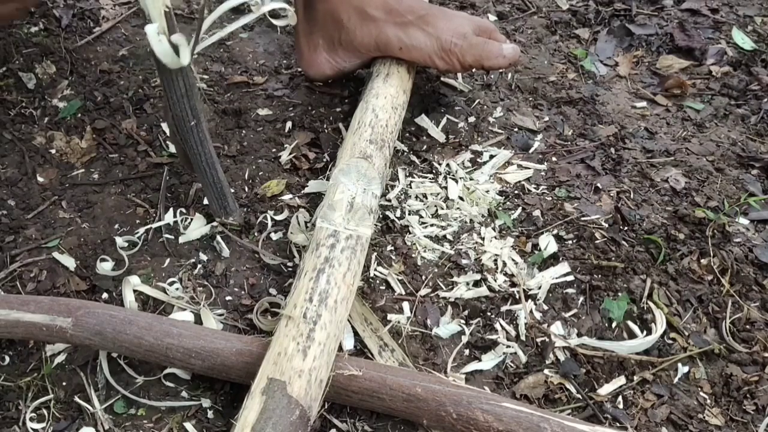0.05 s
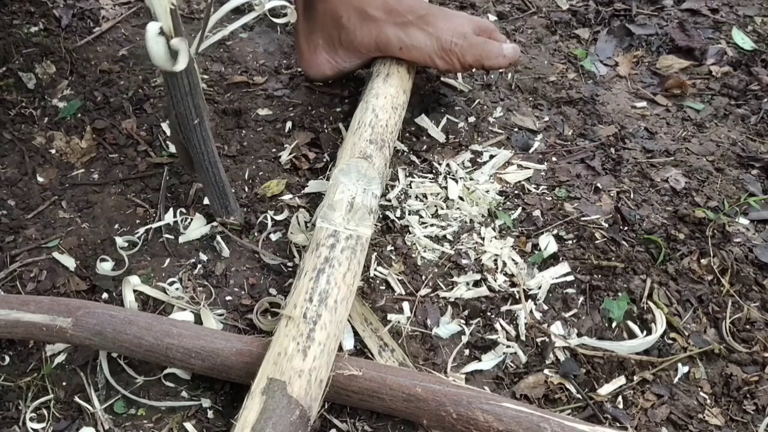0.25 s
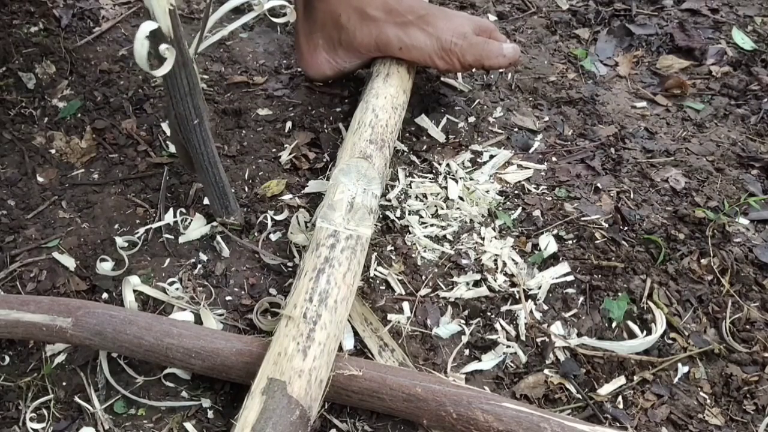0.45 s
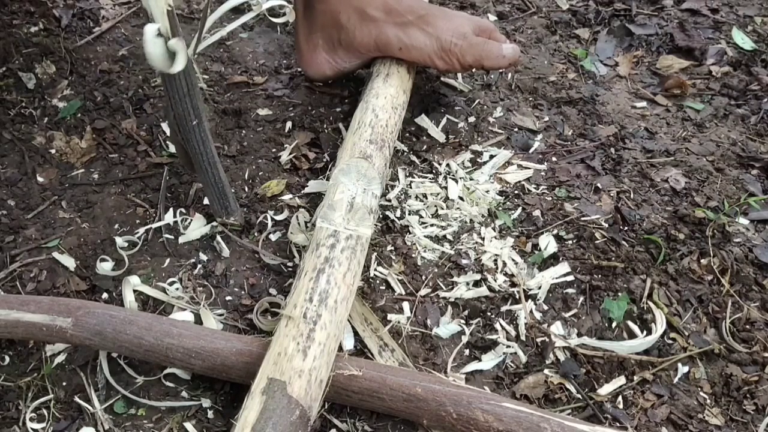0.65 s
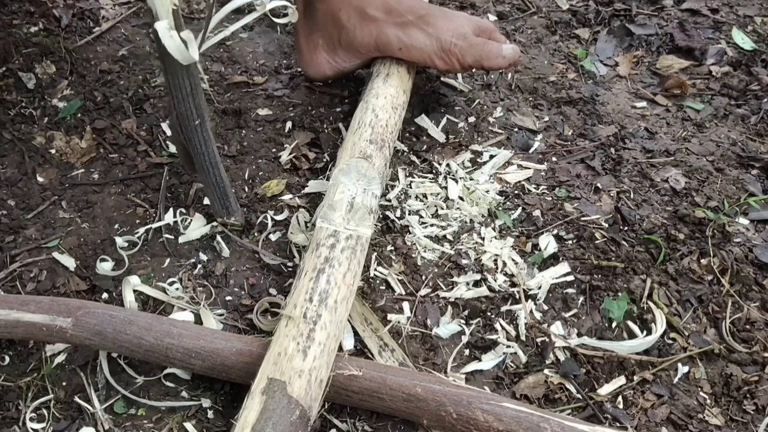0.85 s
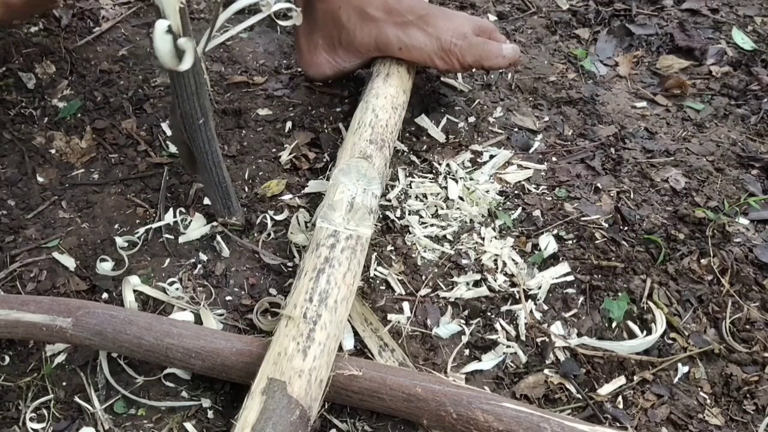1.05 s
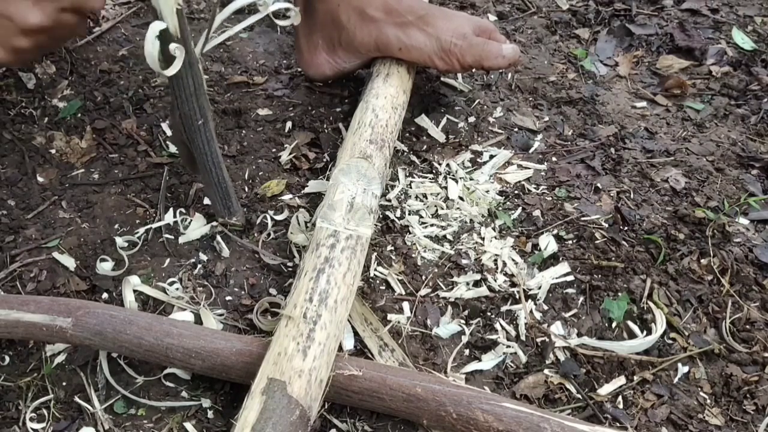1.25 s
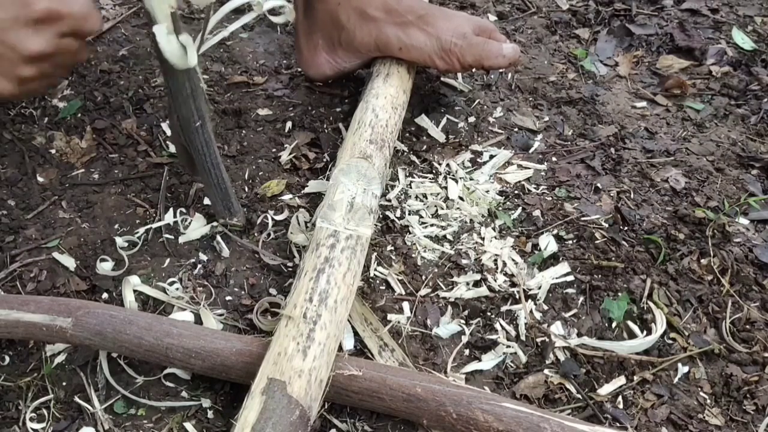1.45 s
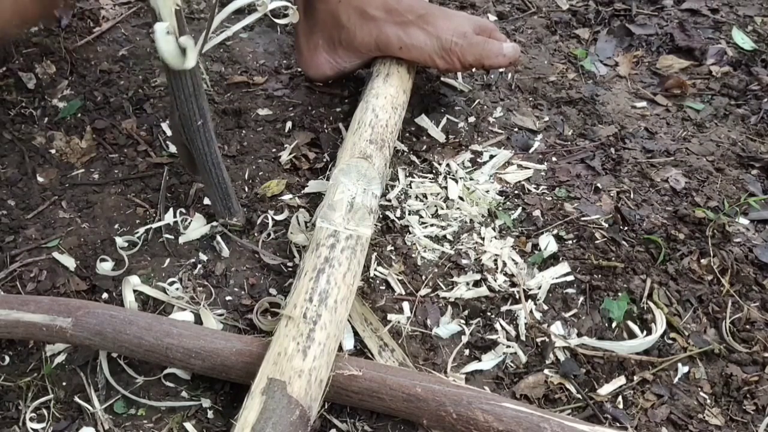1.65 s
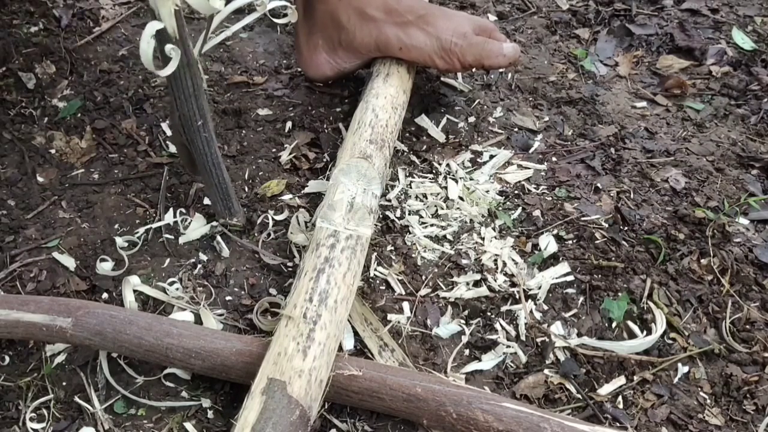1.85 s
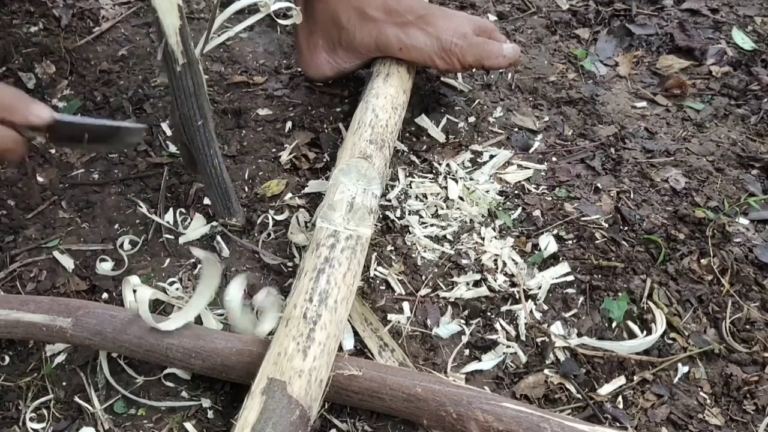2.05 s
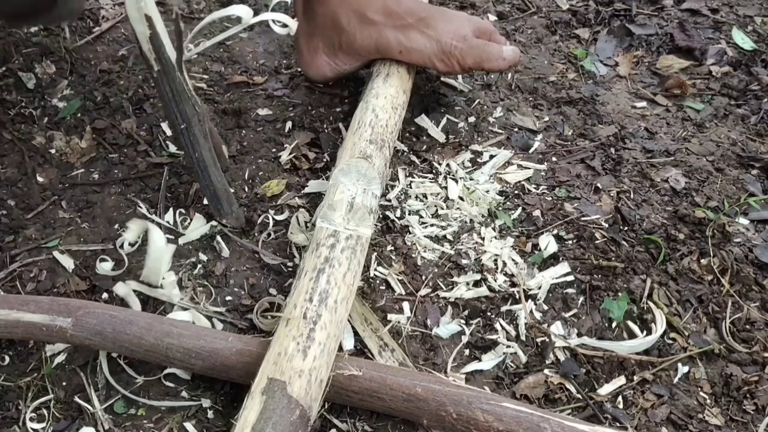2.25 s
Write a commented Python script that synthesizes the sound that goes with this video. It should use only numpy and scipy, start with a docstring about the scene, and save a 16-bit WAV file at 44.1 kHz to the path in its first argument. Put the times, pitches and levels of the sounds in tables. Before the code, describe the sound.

A knife shaves a wooden stick in quick, even, scratchy strokes, close by outdoors.

```python
"""A knife shaves curls off a wooden stick, about four strokes a second, on a forest floor close to
a stereo microphone. Drawn back, the blade sticks and slips in a run of knocks; pushed forward, it
bites, scrapes and ends in a bright crack and a soft thud. The stick rumbles faintly against the
ground. Ground and trees return short reflections; behind lie still air and a thin hiss of far insects."""
import sys
import numpy as np
from scipy import signal
from scipy.fft import rfft, irfft, next_fast_len
from scipy.io import wavfile
from scipy.ndimage import uniform_filter1d

SR = 44100
rng = np.random.default_rng(int(sys.argv[2]) if len(sys.argv) > 2 else 0)


def unload_audio(sound):
    """Save the sound as a 16-bit wav file, at the path given as the first command line argument."""
    columns = np.transpose(np.atleast_2d(sound))
    # keep every value between -1 and 1, then stretch to whole-number steps
    steps = np.round(np.clip(columns, -1, 1) * 32767)
    wavfile.write(sys.argv[1], SR, steps.astype(np.int16))


N = 105840
T = np.arange(N) / SR
GRAIN_WIDTH = 0.22  # side over mid: the blade's noise sits near the centre

# The blade is drawn back. Each row: first full slip in seconds, slip rate in Hz,
# time at full pressure in seconds, relative level in dB.
DRAGS = [(0.089, 104, 0.015, -39.5), (0.3121, 119, 0.016, -37), (0.5447, 133, 0.022, -37),
         (0.7835, 147, 0.017, -33.5), (1.0212, 160, 0.022, -35), (1.2442, 188, 0.021, -34.5),
         (1.4731, 158, 0.015, -34), (1.6990, 122.4, .025, -36), (1.9594, 154, 0.0095, -40.5)]


def from_db(db):
    """Decibels to gain."""
    return 10 ** (np.asarray(db) / 20)


def at_hz(points, hz):
    """Read a table on a log-frequency axis."""
    f, value = np.transpose(points)
    return np.interp(np.log(hz + 1), np.log(f), value)


def colour(x, spectrum, size=4096):
    """Causal filter with the spectrum's shape; white noise keeps its power."""
    gain = from_db(at_hz(spectrum, np.fft.rfftfreq(size, 1 / SR)))
    cepstrum = irfft(np.log(gain))
    cepstrum[1:size // 2] *= 2  # fold to minimum phase
    cepstrum[size // 2 + 1:] = 0
    response = irfft(np.exp(rfft(cepstrum)))
    response /= np.linalg.norm(response)
    return signal.fftconvolve(np.atleast_2d(x), response[None], axes=1)[:, :N]


def stereo_noise(width, size=N):
    """White noise, alike on both sides but for a side share."""
    mid, side = rng.standard_normal((2, size))
    return (mid + width * side * np.array([[1], [-1]])) / np.hypot(1, width)


def envelope(peak_s, rise_s, hold_s, decay_s):
    """Exponential rise to the peak, a hold, an exponential decay."""
    return np.exp(np.minimum(T - peak_s, 0) / rise_s - np.maximum(T - peak_s - hold_s, 0) / decay_s)


def clicks(s, db):
    """Single impulses at the given times."""
    x = np.zeros(N) + 1e-18
    x[np.clip((np.asarray(s) * SR).astype(int), 0, N - 1)] = from_db(db)
    return x


def resonate(x, hz, width):
    """One resonance with gain 1 at its peak."""
    r = np.exp(-np.pi * width / SR)
    poles = [1, -2 * r * np.cos(2 * np.pi * hz / SR), r * r]
    return signal.lfilter(np.array([1, 0, -1]) * (1 - r * r) / 2, poles, x)


def grains(spread_db, size=12):
    """Noise of tearing fibres: tiny clumps of uneven strength, rms 1."""
    clumps = uniform_filter1d(rng.standard_normal(N), size) * np.sqrt(size)
    x = stereo_noise(GRAIN_WIDTH) * from_db(spread_db * clumps)
    return x / x.std()


def forest_air():
    """Still air all around the microphone, with far insects hissing near 6 kHz."""
    # Each row: frequency in Hz, relative level in dB.
    spectrum = [(30, -21), (60, -1), (110, -2.5), (320, -8.5), (550, -14), (1400, -16), (4400, -21.5),
                (5100, -31), (6000, -3), (7200, -26.5), (16000, -28)]
    return from_db(-72.5) * colour(stereo_noise(width=0.78), spectrum)


def stick_rumble(full_s=0.94, work_end_s=2.186):
    """The stick shifts against the ground until the work stops."""
    # Each row: frequency in Hz, relative level in dB.
    spectrum = [(30, -58.5), (60, -34.5), (100, 2.5), (170, 0.5), (260, -6.5), (600, -17.5), (1500, -18.5),
                (2700, -13.5), (5000, -18.5), (10000, -24.5), (16000, -47)]
    level = from_db(-63.5) * envelope(full_s, rise_s=3.6, hold_s=work_end_s - full_s, decay_s=0.024)
    return level * colour(stereo_noise(width=0.335), spectrum)


def rasp():
    """The edge rubs over the grain while it is drawn back."""
    # Each row: frequency in Hz, relative level in dB.
    spectrum = [(100, -49), (350, 7), (650, 11.5), (1700, 0), (2700, -7.5), (4200, 1), (6000, -1.5),
                (10000, -14.5), (13000, -13.5), (16000, -34)]
    pressure = sum(from_db(db - 16) * envelope(s, rise_s=0.009, hold_s=hold, decay_s=0.02)
                   for s, _, hold, db in DRAGS)
    return colour(pressure * grains(spread_db=3), spectrum)


def slips(count=14):
    """Stick-slip as (seconds, dB): each drag builds, runs evenly under pressure, fades and stumbles."""
    rise_db_per_s, sag_db_per_s, release_db_per_s = 1200, 50, 380
    drop_db, spread_db, jitter_periods = 7, 0.8, 0.18
    rows = []
    for start, rate_hz, hold, db in DRAGS:
        timing, force = rng.standard_normal((2, count))
        t = (np.arange(count) - 2) / rate_hz  # two weak slips lead in
        late = np.maximum(t - hold, 0)
        loose = np.minimum(late * rate_hz, 1)
        level = db + rise_db_per_s * np.minimum(t, 0) - sag_db_per_s * np.clip(t, 0, hold)
        level -= release_db_per_s * late + drop_db * loose
        stumble = jitter_periods / rate_hz * np.cumsum(loose * timing)
        rows += zip(start + t + stumble, level + spread_db * force)
    return rows


def knocks():
    """Every slip and tap strikes the stick's modes unevenly and throws off a puff of grit."""
    # Single touches of the blade. Each row: time in seconds, relative level in dB.
    taps = [(0.1772, -74), (0.404, -62), (0.8418, -46), (0.996, -44.5), (1.0798, -46), (1.1064, -55),
            (1.1172, -36), (1.3067, -54), (1.3467, -33), (1.5301, -46), (1.5781, -34.5), (1.7668, -44.5),
            (1.805, -48.5), (1.8144, -31), (1.9208, -42.5), (1.9382, -43), (2.0025, -45), (2.0355, -56),
            (2.0433, -35.5), (2.0497, -41.5), (2.0577, -45), (2.1339, -35.5), (2.1394, -40.5)]
    # The stick's modes. Each row: frequency in Hz, bandwidth in Hz, relative level in dB.
    modes = [(401, 68, -9), (514, 91, -2), (619.7, 83, 4), (1124, 126, -1), (1458, 310, -3.5),
             (2260, 93, 1.5), (2448, 45, -5.5), (2781, 127, 4.5), (3900, 124, 3.5), (4950, 460, -20.5)]
    # Each row: frequency in Hz, relative level in dB.
    grit_spectrum = [(100, -25), (400, 10), (900, -7.5), (1800, -7.5), (2800, -4.5), (4200, 5),
                     (6000, -14.5), (10000, -44), (16000, -40.5)]
    strike_db, spread_db, spread_s = 30.5, 1.5, 0.00015
    grit_db, grit_decay_s = -4, 0.0012
    s, db = np.transpose(slips() + taps)
    rings = 0
    for k, (hz, width, mode_db) in enumerate(modes):
        timing, force = rng.standard_normal((2, len(s)))
        hits = clicks(s + spread_s * timing, db + mode_db + strike_db + spread_db * force)
        polarity = (-1) ** (k // 3)
        rings += polarity * resonate(hits, hz, width)
    puffs = signal.lfilter([1], [1, -np.exp(-1 / (grit_decay_s * SR))], clicks(s, db + grit_db))
    return rings + colour(puffs * stereo_noise(GRAIN_WIDTH), grit_spectrum)


def cuts():
    """The bite swells until the shaving splits and peels away; the stick thuds and more fibres snap."""
    # Forward strokes. Each row: split in seconds, then bite, crack, splinter, peel and thud in dB.
    strokes = [(0.214, -36, -35.5, -41, -49, -68), (0.4376, -37.5, -28.5, -61, -43, -82),
               (0.6736, -33.5, -30.5, -34.5, -44, -63), (0.904, -32.5, -40, -33, -44.5, -59.5),
               (1.1342, -40.5, -24.5, -31, -37.5, -58.5), (1.3659, -36, -37.5, -24, -45, -63.5),
               (1.6023, -39, -29.5, -26.5, -42.5, -52), (1.8351, -41.5, -33.5, -31, -43, -51),
               (2.0667, -50, -36.5, -25.5, -29.5, -48)]
    # Fibres giving way after a cut. Each row: time in seconds, level in dB.
    fibre_snaps = [(0.224, -62), (0.4498, -38), (0.687, -54), (.917, -44), (1.146, -45), (1.38, -47),
                   (1.611, -36.5), (1.6404, -38), (1.8517, -28.5), (1.876, -43.5), (2.073, -58.5),
                   (2.079, -58), (2.083, -65), (2.1, -41), (2.136, -43.5), (2.141, -48.5), (2.372, -58)]
    # The five spectra of a cut. Each row: frequency in Hz, relative level in dB.
    bite_spectrum = [(100, -11), (300, 9.5), (700, 8), (1600, 3), (2500, 8), (4200, 9.5), (6000, -1),
                     (10000, -22), (16000, -32.5)]
    crack_spectrum = [(100, -5.5), (350, -4), (700, 4.5), (900, -7.5), (1200, -1.5), (1700, -7),
                      (2400, -0.5), (3300, 6), (4500, -0.5), (5600, -11.5), (8000, -22.5), (16000, -11.5)]
    splinter_spectrum = [(300, 2), (2000, -3), (4300, 15.5), (5500, -0.5), (6700, -10.5), (7600, 10),
                         (8500, 4.5), (10000, 7.5), (12000, 8.5), (15500, -7.5)]
    peel_spectrum = [(100, -15.5), (350, 0), (800, -5), (1600, -5.5), (2500, 3), (3300, 0), (4300, -18),
                     (6000, 1.5), (8000, -10.5), (11000, -2), (16000, -14)]
    thud_spectrum = [(30, -27), (60, -8), (110, 1.5), (170, 5.5), (290, -13), (450, -19), (1000, -1.5),
                     (4000, -70.5)]
    bite = crack = splinter = peel = thud = 0
    for s, bite_db, crack_db, splinter_db, peel_db, thud_db in strokes:
        bite += from_db(bite_db) * envelope(s, rise_s=0.0062, hold_s=0, decay_s=0.0022)
        split = envelope(s, rise_s=0.0005, hold_s=0.0029, decay_s=0.0009)
        crack += from_db(crack_db) * split
        splinter += from_db(splinter_db) * split
        peel += from_db(peel_db) * envelope(s, rise_s=0.0023, hold_s=0.0027, decay_s=0.011)
        thud += from_db(thud_db) * envelope(s, rise_s=0.0058, hold_s=0.01, decay_s=0.016)
    snaps = sum(from_db(db) * envelope(s, rise_s=0.0014, hold_s=0.0024, decay_s=0.0022)
                for s, db in fibre_snaps)
    return (colour(bite * grains(spread_db=3), bite_spectrum)
            + colour(peel * grains(spread_db=3), peel_spectrum)
            + colour((crack + from_db(-13) * snaps) * grains(spread_db=0.8), crack_spectrum)
            + colour((splinter + snaps) * grains(spread_db=0.8), splinter_spectrum)
            + colour(thud * rng.standard_normal(N), thud_spectrum))


def breakaway(at_s=2.069, strike_db=7.5):
    """The last shaving lets go and the stick rings with a hollow knock."""
    # Each row: frequency in Hz, bandwidth in Hz, relative level in dB.
    modes = [(204, 20, 3.5), (292, 15, 3), (877, 67, -2.5), (3380, 170, 8.5)]
    return sum(resonate(clicks(at_s, strike_db + db), hz, width) for hz, width, db in modes)


def reflections(x, db, t60_s, build_s=0.0078):
    """Diffuse reflections, a little different on each side of the microphone."""
    t = T[:SR // 2]
    tail = stereo_noise(width=0.35, size=len(t)) * from_db(-60 * t / t60_s) * (1 - np.exp(-t / build_s))
    tail *= from_db(db) / np.linalg.norm(tail, axis=1, keepdims=True)
    return signal.fftconvolve(x, tail, axes=1)[:, :N]


def microphone(x):
    """The knife reaches the right port first, and the housing colours each side."""
    # Each row: frequency in Hz, level of right over left in dB.
    right_louder = [(200, -1.5), (600, 2), (1400, 2.5), (2100, -2), (2450, 15.5), (2900, -7), (4500, -1),
                    (6000, 0), (7600, -5.5), (9500, 10.5), (12000, 4.5), (15000, 5.5)]
    # Each row: frequency in Hz, delay at the left port in seconds.
    left_lag = [(1000, .00012), (3000, 0.00014), (4300, .00015), (6000, 0.00011), (7500, 0.00012),
                (12000, 0.00013)]
    size = next_fast_len(N + SR // 10)
    hz = np.fft.rfftfreq(size, 1 / SR)
    tilt = from_db(at_hz(right_louder, hz) / 2)
    delay = np.exp(-2j * np.pi * hz * at_hz(left_lag, hz))
    return irfft(rfft(x, size) * np.array([delay / tilt, tilt]), size)[:, :N]


def scene():
    """Knife and stick up close, ground and trees around them, forest air behind."""
    knife = knocks() + rasp() + cuts() + breakaway()
    ground = reflections(knife, db=-16, t60_s=0.08)
    trees = reflections(knife, db=-17, t60_s=0.18)
    return microphone(knife + ground + trees) + stick_rumble() + forest_air()


def record(dry, low_cut_hz=69, high_cut_hz=16300):
    """The recorder rolls off the deep bass and cuts the top steeply."""
    low_cut = signal.butter(2, low_cut_hz, "high", fs=SR, output="sos")
    high_cut = signal.ellip(10, 0.1, 80, high_cut_hz, fs=SR, output="sos")
    return signal.sosfilt(high_cut, signal.sosfilt(low_cut, dry))


dry = scene()
out = record(dry)
unload_audio(out)
```